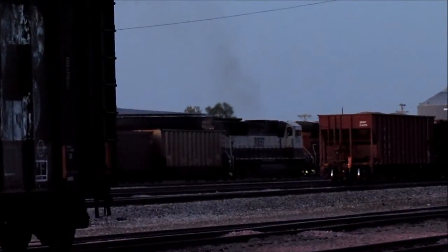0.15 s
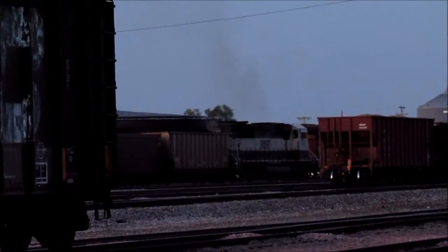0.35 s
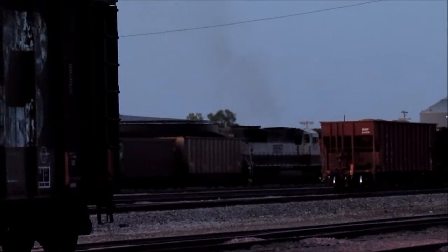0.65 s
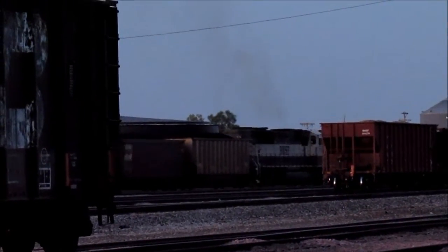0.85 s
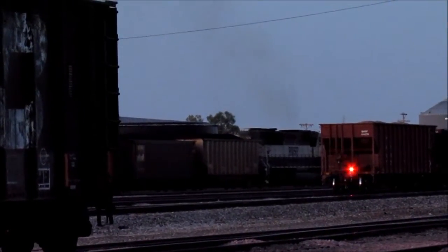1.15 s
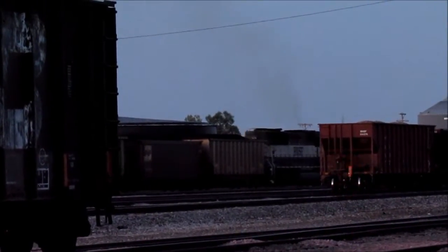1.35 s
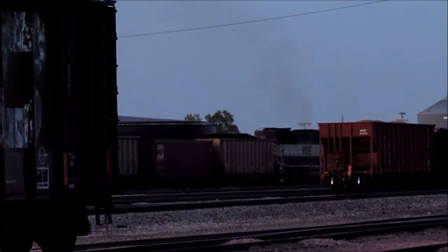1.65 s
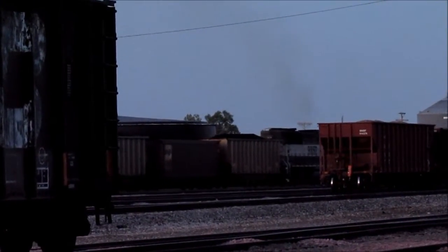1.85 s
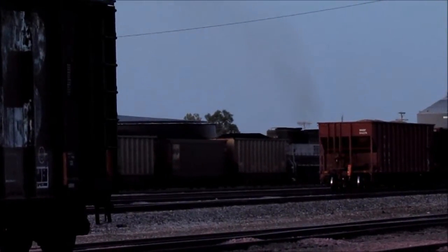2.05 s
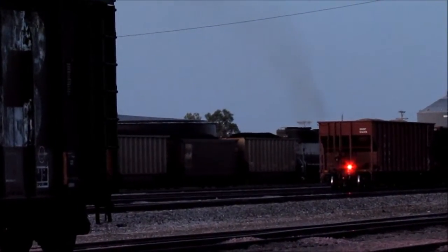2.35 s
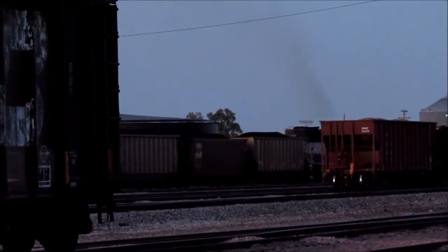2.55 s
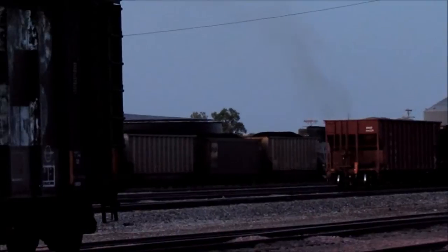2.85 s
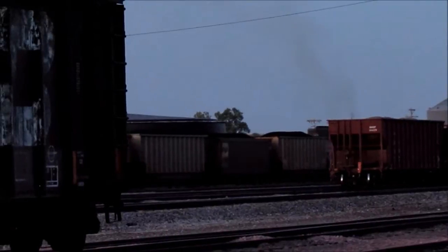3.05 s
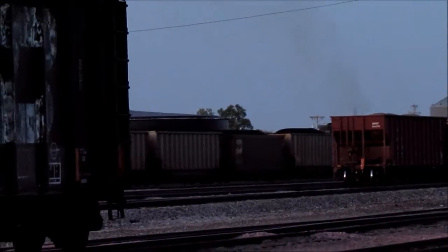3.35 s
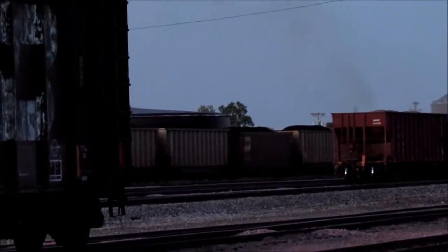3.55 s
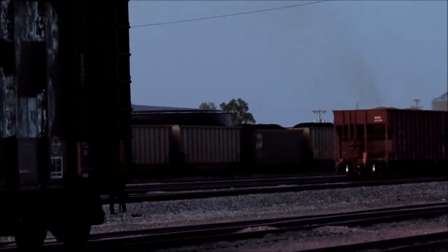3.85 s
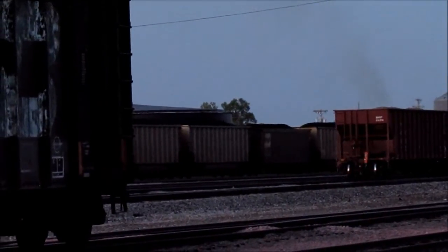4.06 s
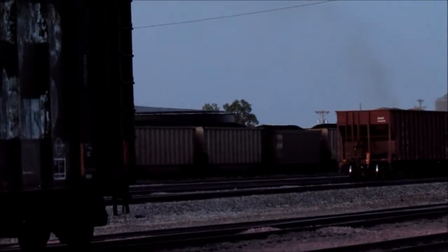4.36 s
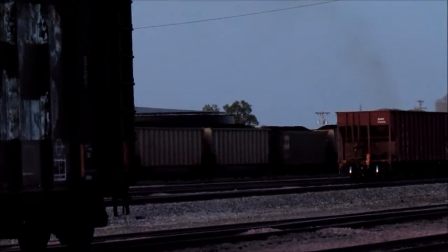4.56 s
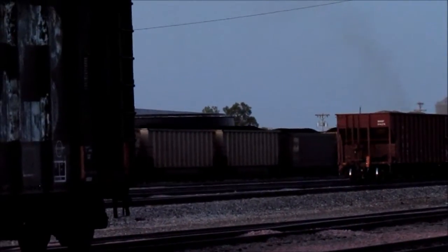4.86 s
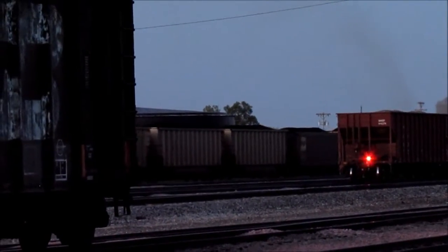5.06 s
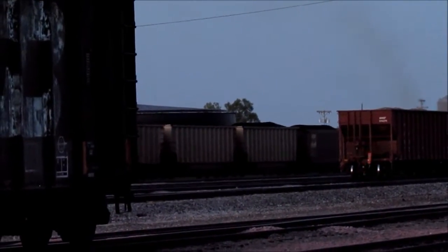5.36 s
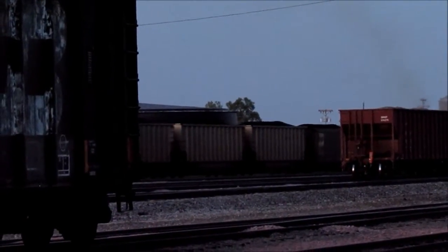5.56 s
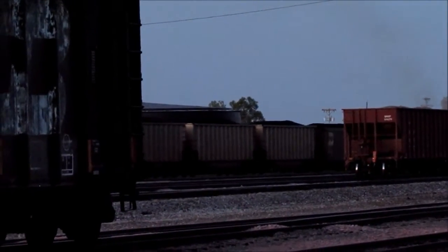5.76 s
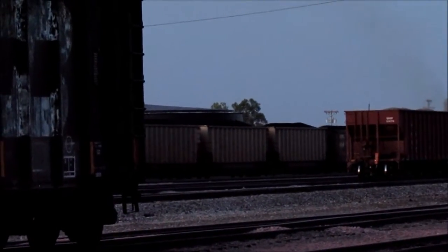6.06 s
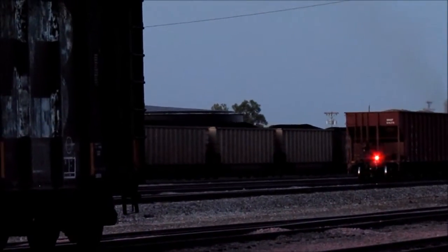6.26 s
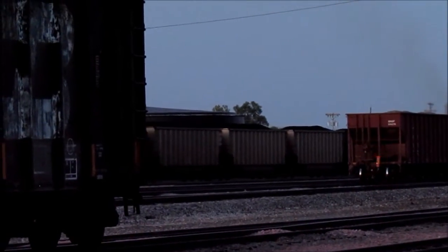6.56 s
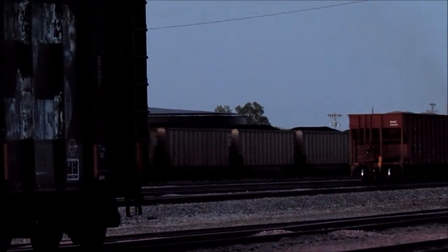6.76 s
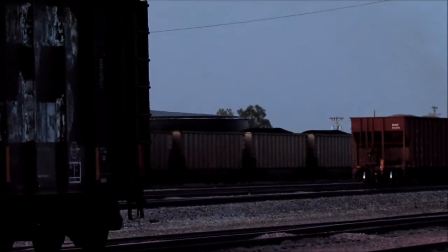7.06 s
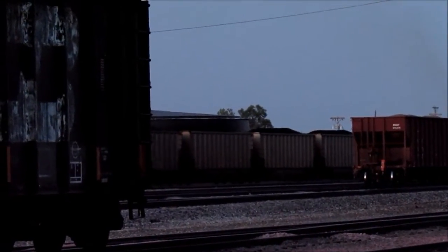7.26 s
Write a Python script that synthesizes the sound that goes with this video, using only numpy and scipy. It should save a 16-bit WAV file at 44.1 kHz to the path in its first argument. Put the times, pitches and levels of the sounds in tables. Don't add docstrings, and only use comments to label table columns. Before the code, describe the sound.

For just over seven seconds, a freight train moves slowly through an open yard, heard from beside the track. From the start a locomotive blower holds a constant whine, with a low-mid fundamental and a stack of ringing overtones that flutter, dip and flash separately as echoes change. Below it a diesel throbs softly amid deep wheel rumble. Rushing air is strongest over the first two seconds, then eases slightly. From about 0.3 seconds, tiny, very high steel squeaks recur three times a second, gradually a little louder. Around 2.5 seconds and again from 4.4 to 5.1, a rough gear tone rises briefly. After 4 seconds the rolling noise of nearer cars grows, with airy puffs through gaps; soft gritty hisses become clearer after 6. The treble widens and leans right, and everything continues to the end without stopping.

```python
import sys
import numpy as np
from scipy import signal
from scipy.fft import rfft, irfft, next_fast_len
from scipy.io import wavfile
from scipy.ndimage import uniform_filter1d

SR = 44100
rng = np.random.default_rng(int(sys.argv[2]) if len(sys.argv) > 2 else 0)


def master(y):
    cut = np.clip(np.atleast_2d(y).T, -1, 1)
    pcm = np.round(cut * 32767)
    wavfile.write(sys.argv[1], SR, pcm.astype(np.int16))


def to_linear_factor(level_db):
    exponent = np.asarray(level_db, float) / 20
    return 10 ** exponent


N = 327214
BLADE_HZ = 324.4
FIRING_HZ = 12.8

# multiple of BLADE_HZ, level_db
OVERTONES = [(7, -38), (8, -39), (9, -39.5), (10, -41), (11, -45.5), (12, -43.5), (13, -46.5), (14, -47),
             (15, -49.5), (16, -46), (17, -46.5), (18, -48.5), (19, -51.5), (20, -51.5), (21, -60),
             (22, -58)]
# centre_s, partial (number), lift_db, half_width_s
GLINTS = [(0.24, 10, -12.5, 0.04), (0.6, 7, 9, 0.068), (0.5, 8, 7, 0.2), (0.7, 9, 5.5, 0.25),
          (0.76, 8, -11.0, 0.04), (0.8, 7, -13, 0.04), (0.92, 8, 7, 0.06), (0.98, 7, 8, 0.053),
          (1.04, 9, -13, 0.04), (1.04, 10, -11.0, 0.04), (1.64, 8, 8, 0.04), (1.14, 9, 7, 0.036),
          (1.42, 8, 3, 0.35), (1.62, 7, 5, 0.065), (1.36, 10, 4, 0.06), (1.8, 9, 9, 0.048),
          (2.06, 7, -7, 0.24), (2.18, 9, -16.5, 0.04), (2.56, 10, -12.0, 0.034), (2.64, 7, -11.0, 0.12),
          (2.64, 9, -7.5, 0.6), (2.68, 8, -4, 0.18), (3.38, 8, -14, 0.077), (3.42, 9, -15, 0.067),
          (3.46, 10, -2.5, 1.0), (3.48, 7, -8.0, 0.22), (3.96, 8, 7, 0.14), (4.06, 7, 9, 0.06),
          (4.06, 10, 11.5, 0.08), (4.48, 8, -10.0, 0.049), (4.8, 7, -11.5, 0.051), (5.16, 10, 4, 0.14),
          (5.38, 9, -6.0, 0.082), (5.4, 10, -10, 0.053), (5.54, 8, -9.0, 0.04), (5.7, 10, -10.5, 0.09),
          (5.88, 9, 6, 0.04), (5.98, 10, -16, 0.061), (6.04, 7, 5, 0.14), (6.12, 8, 2, 0.22),
          (6.34, 7, -10, 0.06), (6.6, 10, -9, 0.06), (6.62, 7, 9, 0.035), (6.64, 9, -8.0, 0.06),
          (6.68, 10, 8, 0.6), (5.55, 10, 3, 0.05), (7.02, 9, 4.5, 0.95), (7.08, 8, -11, 0.04),
          (7.1, 9, -13.0, 0.045), (7.12, 8, 1.5, 0.35),
          (0.02, 11, -17.0, 0.04), (0.04, 15, 7.5, 0.06), (0.06, 16, 9, 0.067),
               (0.22, 13, -10.5, 0.09), (0.34, 16, -12.0, 0.13), (0.76, 13, -15.0, 0.04),
               (0.88, 11, -8.0, 0.09), (0.9, 11, 6, 0.6), (1.16, 13, 4, 0.2), (1.16, 15, -15, 0.09),
               (1.26, 11, -13, 0.06), (2.14, 12, -5, 0.96), (2.14, 14, -7.5, 0.95), (2.26, 15, -4, 0.96),
               (2.34, 13, -7.5, 1.0), (2.68, 11, -7, 0.35), (2.78, 14, 5, 0.1), (3.18, 16, -14.5, 0.06),
               (3.62, 12, -15.0, 0.04), (3.62, 16, -12, 0.38), (3.86, 11, 10.5, 0.04), (4.0, 13, 6, 0.14),
               (4.08, 11, -4.5, 1.0), (4.38, 16, 10, 0.12), (4.9, 14, 7, 0.09), (4.92, 15, -4, 0.14),
               (5.06, 11, -5, 0.14), (5.24, 15, -15.0, 0.04), (5.36, 11, 5, 0.09), (5.54, 15, 6, 0.06),
               (5.58, 13, 10, 0.04), (5.6, 16, 2.5, 0.94), (5.74, 15, 11.5, 0.95), (5.88, 13, -3, 0.2),
               (5.9, 16, -10.0, 0.06), (5.92, 11, -13.0, 0.04), (5.96, 12, -15.5, 0.065),
               (6.1, 12, 5, 0.04), (6.85, 13, 4, 0.08), (6.22, 11, 8, 0.09), (6.22, 15, -11, 0.14),
               (6.26, 14, 5.5, 1.0), (6.34, 13, 11.5, 1.0), (6.54, 12, 8, 1.0), (6.58, 11, 3, 0.81),
               (6.76, 11, -10.5, 0.09), (6.76, 12, -11, 0.04), (6.9, 15, 9.0, 0.06)]


def blower(duct_db):
    turns = np.cumsum(BLADE_HZ + 0.0463 * drift(0.4)) / SR + 0.0065 * drift(44)
    out = 0
    for k, level_db in enumerate(fades(), 1):
        out += partial(k * turns, k * BLADE_HZ, level_db, scatter=0.0007 * k ** 3, rate=3.5 * k, wander=0.09 * k)
    for k, level_db in OVERTONES:
        glint_db = bumps(for_item(GLINTS, k))
        out += partial(k * turns, k * BLADE_HZ, level_db + glint_db,
                       scatter=0.3, rate=2.4 * k, wander=0.44 * np.sqrt(k))
    duct_hz = 1922
    out += partial(duct_hz * np.arange(N) / SR, duct_hz, duct_db - 0.5, scatter=0.95, rate=80.0)
    shake = 1 + 0.035 * np.sin(4 * np.pi * FIRING_HZ * np.arange(N) / SR)
    return shake * out


# time_s, shed_wall_m, car_side_m
DETOURS = [(0.0, 8.65, 24.212), (0.53, 9.352, 24.935), (1.06, 9.981, 25.498), (1.59, 10.502, 26.167),
           (2.12, 11.087, 26.714), (2.65, 11.732, 26.815), (3.18, 12.377, 26.961), (3.71, 13.104, 27.44),
           (4.24, 13.351, 27.718), (4.77, 14.101, 28.039), (5.3, 14.704, 28.212), (5.83, 15.133, 28.629),
           (6.36, 15.58, 28.969), (6.89, 16.134, 29.365), (7.42, 16.159, 29.496)]
# time_s, direct_db, wall_echo_db, car_echo_db
PATHS_OPEN = [
    (0.0, 6.5, 5.5, 7),
    (1.24, 4.5, 15, -8),
    (2.47, -2, 4.5, 6.5),
    (3.71, -4, 2, 6),
    (4.95, -1.27, -9.5, -0.2),
    (6.18, -2.5, -12.5, -6.5),
    (7.42, -3, -3, -4),
]
# direct_db, wall_echo_db, car_echo_db, direct_share (of its opening), growth_db_per_s
PARTIALS = [
    (-36.5, -39.5, -37, 2.74, 5),
    (-31, -29.5, -32.5, 3.85, 5.5),
    (-25, -49.5, -46, 0.59, 0.5),
    (-25, -49, -34.5, 0.83, 0.6),
    (-25, -64, -47.5, 0.7, -0.26),
    (-27, -49.5, -45.5, 1.04, 0.86),
]
REFLECT_DEPTH = [(0.02, 0.921), (0.478, 0.076), (0.32, 0.3), (0.15, 0.004), (0.148, 0.189), (0.16, 0.074)]
# centre_s, partial (number), depth_db, half_width_s
DROPOUTS = [(0.05, 4, -13, 0.062), (0.47, 2, -5, 0.09), (0.79, 4, -10, 0.032), (0.95, 4, -17, 0.029),
            (1.76, 3, -11, 0.055), (1.95, 2, -6, 0.27), (1.99, 3, -4.4, 0.093), (2.34, 3, -10, 0.046),
            (2.64, 3, -24, 0.098), (3.36, 2, -16, 0.063), (3.42, 4, -6, 0.25), (3.71, 2, -12, 0.059),
            (4.27, 3, -12, 0.053), (4.4, 4, -17, 0.013), (4.45, 3, -5.4, 0.042), (4.74, 4, -14, 0.078),
            (4.95, 5, -2.5, 0.1), (5.93, 2, -4, 0.026), (2.29, 2, -5, 0.023), (0.54, 2, -6, 0.034),
            (5.68, 2, -1.5, 0.077), (5.17, 1, -12, 0.058), (2.18, 1, -2, 0.06), (4.45, 6, -6, 0.033),
            (5.37, 3, -9.5, 0.093), (5.56, 4, -12, 0.32), (6.27, 3, -8, 0.047), (6.31, 4, -9, 0.095),
            (6.68, 2, -11.5, 0.084), (6.86, 3, -5.5, 0.22), (7.37, 3, -16, 0.065),
            (0.05, 5, -3.5, 0.16), (0.28, 6, -5, 0.053), (0.5, 6, -16, 0.046), (0.71, 6, -25, 0.082),
                  (0.99, 5, -12, 0.044), (1.04, 6, -9, 0.068), (1.229, 5, -13, 0.03), (1.88, 5, -9, 0.042),
                  (2.35, 5, -31, 0.029), (2.56, 6, -29.1, 0.057), (3.26, 6, -30.0, 0.027),
                  (3.72, 6, -17.3, 0.018), (3.93, 6, -30.0, 0.018), (4.19, 5, -11, 0.034),
                  (4.47, 5, -12, 0.027), (4.76, 6, -19, 0.062), (5.16, 6, -14, 0.033), (5.4, 6, -9, 0.03),
                  (5.47, 5, -11.5, 0.063), (5.839, 6, -5.5, 0.32), (5.99, 5, -6, 0.068),
                  (6.34, 6, -10, 0.14), (6.73, 5, -10, 0.051), (7.02, 6, -15, 0.044)]
# centre_s, partial (number), lift_db, half_width_s
SWELLS = [(0, 1, 5.5, 0.18), (0.17, 5, 8, 0.047), (1.1, 4, 6, 0.044), (1.34, 2, 4, 0.07),
          (1.52, 5, 4.5, 0.19), (1.65, 6, 3.5, 0.16), (2.09, 2, 7.5, 0.15), (2.14, 6, 8, 0.014),
          (2.26, 5, 4.5, 0.14), (2.51, 6, 9, 0.067), (2.61, 3, 4.5, 0.42), (2.89, 6, 7.5, 0.11),
          (2.9, 4, 4.5, 0.093), (3.32, 4, 16, 0.039), (3.38, 1, 5, 0.28), (3.41, 6, 6.5, 0.076),
          (3.92, 2, 6, 0.18), (3.94, 5, 7.5, 0.2), (4.06, 4, 13, 0.054), (4.1, 6, 8, 0.091),
          (4.31, 5, 7, 0.038), (4.66, 3, 5, 0.068), (5.08, 6, 5.5, 0.062), (5.19, 3, 5.5, 0.24),
          (5.23, 4, 9, 0.56), (5.8, 3, 5, 0.089), (6.02, 6, 8.5, 0.067), (6.22, 6, 11, 0.083),
          (7.06, 4, 7, 0.019), (7.34, 5, 8, 0.16)]
# centre_s, partial (number), lift_db
BLINKS = [(0.3, 5, -5), (0.55, 3, -1), (0.83, 3, 0), (1.42, 4, -11), (2.02, 5, -10), (2.59, 4, -12),
          (2.78, 4, -12), (2.72, 6, -8), (3.13, 5, -16), (3.62, 3, -9), (4.35, 6, -5), (4.51, 4, -8),
          (4.82, 5, -11), (5.53, 4, -13), (5.67, 4, -20), (5.72, 5, 2), (6.5, 6, 6), (6.7, 4, -9),
          (6.93, 3, -10), (7.27, 6, 0), (7.28, 4, -15)]


def fades():
    speed_m_per_s, midway_s, blink_s = 343, 3.7, 0.013
    detours = in_time(DETOURS)
    direct_open, *echo_open = in_time(PATHS_OPEN)
    rows = DROPOUTS + SWELLS + [(*blink, blink_s) for blink in BLINKS]
    levels = []
    for k, (row, depths) in enumerate(zip(PARTIALS, REFLECT_DEPTH), 1):
        direct_db, *echo_db, share, growth = row
        wave_m = speed_m_per_s / (k * BLADE_HZ)
        paths = to_linear_factor(direct_db + share * direct_open)
        for db, open_db, detour, depth in zip(echo_db, echo_open, detours, depths):
            paths = paths + to_linear_factor(db + open_db) * np.exp(2j * np.pi * (detour + depth) / wave_m)
        approach_db = growth * (np.arange(N) / SR - midway_s)
        levels.append(20 * np.log10(np.abs(paths) + 1e-6) + approach_db + bumps(for_item(rows, k)))
    return levels


# multiple of FIRING_HZ, level_db (under the rumble)
EXHAUST = [(4, -13), (6, -6), (7, -15), (8, -9), (9, -13), (10, -4), (11, -15), (12, -10), (14, -7),
           (15, -15), (17, -21), (19, -19), (21, -21), (23, -21)]
# pitch_hz, level_db (per Hz)
RUMBLE = [(25, -19.5), (40, -10), (60, -1.5), (130, 0.5), (190, -2.5), (230, -8.5), (320, -19.5),
          (450, -57)]
# time_s, level_db
LOAD = [(0.0, -40), (0.12, -38), (0.64, -41.5), (1.24, -38), (1.26, -40.5), (1.49, -40), (1.71, -44.5),
        (3.35, -35), (4.67, -35.5), (5.39, -38.5), (7.25, -34), (7.42, -38)]
# centre_s, peak_db
GEAR_BURSTS = [(0.07, -53), (0.27, -43.5), (0.42, -56), (0.86, -41), (1.02, -51), (1.46, -41), (2.11, -55),
               (2.45, -31), (2.8, -37), (2.95, -37), (3.77, -42), (4.42, -33), (4.56, -32.5), (4.7, -39),
               (4.83, -30), (5.05, -28), (5.2, -40), (5.52, -40), (5.99, -34.5), (6.75, -52)]


def diesel():
    load_db, = in_time(LOAD)
    turns = np.cumsum(FIRING_HZ * (1 + 0.00453 * drift(0.61))) / SR
    out = 0
    for k, db in EXHAUST:
        out += partial(k * turns, k * FIRING_HZ, load_db + db - 3, scatter=0.25, rate=0.8)
    gear_hz, rest_db, burst_s = 895, -44, 0.04
    gear = to_linear_factor(rest_db) + bumps((s, to_linear_factor(db), burst_s) for s, db in GEAR_BURSTS)
    out += partial(gear_hz * np.arange(N) / SR, gear_hz, 20 * np.log10(gear), scatter=0.71, rate=19.0)
    rumble = bands(19.4, count=14, level_db=lambda hz: at_hz(RUMBLE, hz), patchy_db=-2.5)
    return out + to_linear_factor(load_db - 24.0) * rumble


# centre_s, peak_db
GRIT = [
    (3.85, -59),
    (4.6, -59),
    (5.36, -55),
    (5.72, -55),
    (5.98, -57),
    (6.28, -52),
    (6.6, -48),
    (6.93, -46),
    (7.25, -48),
]


def wheel():
    squeak_hz, first_s, turn_s, squeak_s = 9230, 0.262, 0.3224, 0.032
    squeak_rows = []
    for k, chance in enumerate(rng.standard_normal(22)):
        peak_db = -50 + 0.2 * k + 0.7 * chance
        squeak_rows.append((first_s + k * turn_s, to_linear_factor(peak_db), squeak_s))
    chirp = partial(squeak_hz * np.arange(N) / SR, squeak_hz, np.full(N, -4.0), scatter=0.8, rate=320.0)
    squeaks = bumps(squeak_rows) * chirp
    puffs = bumps((s, to_linear_factor(db), 0.05) for s, db in GRIT)
    high = signal.butter(4, 12000, "high", fs=SR, output="sos")
    hiss = signal.sosfilt(high, rng.standard_normal((2, N)))
    return squeaks + puffs * to_linear_factor(13.0) * stereo(hiss[0], 0.4 * hiss[1], squeak_hz)


# time_s, level_db
AIR = [(0.0, -35), (0.04, -28.5), (0.18, -27.5), (2.46, -33), (2.67, -33.5), (2.91, -31), (3.29, -32.5),
       (5.27, -32), (5.46, -33), (6.16, -34), (6.22, -33), (6.86, -29), (7.0, -33.5), (7.05, -32),
       (7.36, -34), (7.42, -35)]
# time_s, level_db
ROLL = [(0.0, -36.5), (0.18, -38), (1.18, -36.5), (1.65, -40.5), (2.56, -38), (2.62, -37), (3.76, -37),
        (3.89, -33), (4.53, -30.5), (4.73, -28), (5.27, -31.5), (6.18, -31), (6.34, -32), (6.94, -29),
        (7.09, -30.5), (7.42, -28)]
# centre_s, lift_db, half_width_s
PUFFS = [(0.1, 5, 0.079), (0.62, 7.5, 0.74), (2.3, 6.5, 0.21), (2.8, 3.5, .12), (3.9, 4.5, 0.056),
         (4.32, 5.5, 0.27), (4.75, 3, 0.094), (5.0, 4, 0.12), (5.5, -5, 0.15), (5.74, 4.5, 0.05),
         (5.86, 0.5, .04), (6.02, 5.5, 0.079), (6.3, 1.5, .06), (6.45, 1, .06), (6.72, -1, .06),
         (6.94, 1.5, 0.09), (7.12, -7, .05), (7.25, -3, 0.045), (7.37, -10, 0.068)]
# mean_db, air_share, roll_share, puff_share (shares of each swing)
RUSH_MIX = [(-42, 0.1, 0.73, 0.039), (-34.5, 0.73, 0.019, 0.16), (-34, 0.43, 0.46, 0.16),
            (-33.5, 0.01, 0.99, 0.035), (-41.5, 0.14, 0.48, 0.44), (-49, 0.25, 0.2, .7),
            (-55, 0.27, 0.05, 0.89)]
# centre_s, anchor (from 0), lift_db, half_width_s
SHADES = [(1.06, 2, 2.5, 0.99), (1.6, 1.5, 2, .15), (2.9, 2, -2, .3), (1.9, 4.5, 0, .4),
          (1.85, 4.5, -2, .2), (2.12, 5.5, -5, 0.23), (2.6, 1, -0.5, .15), (4.35, 4.5, 2, 0.1),
          (4.76, 3, 0.5, 0.054), (4.45, 2, -5.5, 0.1), (5.35, 2, -2.5, .15), (7.7, 5.5, -1, 0.1),
          (5.8, 3, 3, 0.18), (2.05, 0.5, -2.5, 0.63), (6.0, 4.5, 2.5, .1), (6.8, 1.5, 2, 0.085),
          (5.5, 6, -3, .2), (6.55, 6, -2, .25), (7.3, 6, -2, .15), (7.0, 0, 0.5, .4), (6.1, 2, 3.5, .12)]


def rush_levels():
    air = in_time(AIR)[0] + 33
    roll = in_time(ROLL)[0] + 36
    puffs = bumps(PUFFS)
    levels = []
    for k, (mean_db, air_share, roll_share, puff_share) in enumerate(RUSH_MIX):
        swing = air_share * air + roll_share * roll + puff_share * puffs
        levels.append(mean_db + swing + bumps(for_item(SHADES, k)))
    return levels


RUSH_AT_HZ = [480, 1500, 2800, 4500, 5900, 7800, 10000]
# pitch_hz, level_db (per Hz)
RUSH_SHAPE = [(250, -26), (330, -28), (450, -31.5), (800, -25), (1100, -22.5), (1700, -29.5), (2300, -32),
              (3000, -33), (4400, -35), (6300, -28.5), (7000, -30.5), (9000, -38.5), (11000, -34.5),
              (13000, -31)]
# time_s, share_removed (0-1)
HOLLOW = [
    (0, 0.1),
    (0.6, 0.26),
    (2.3, 0.27),
    (2.8, .15),
    (3.9, 0.08),
    (7.42, 0),
]


def rush(levels):
    def level_db(hz):
        weights = [np.interp(np.log(hz), np.log(RUSH_AT_HZ), row) for row in np.eye(len(levels))]
        return at_hz(RUSH_SHAPE, hz) + sum(w * db for w, db in zip(weights, levels) if w > 0)

    air = bands(257.4, count=17, level_db=level_db, patchy_db=1.36)
    hollow_hz, width_hz = 4440, 530
    hollow = signal.lfilter(*signal.iirpeak(hollow_hz, hollow_hz / width_hz, fs=SR), air)
    return air - np.clip(in_time(HOLLOW)[0], 0, 1) * hollow


def partial(turns, hz, level_db, scatter, rate, wander=0.47):
    direct = np.exp(2j * np.pi * rng.random())
    share = np.clip(scatter, 0, 1)
    echoes = drift(rate) + 1j * drift(rate)
    mid = np.sqrt(1 - share) * direct + np.sqrt(share / 2) * echoes
    side = (drift(0.5 * rate) + 1j * drift(0.41 * rate)) / np.sqrt(2)
    mid = mid * np.exp(1j * wander * side.imag)
    level = to_linear_factor(level_db)
    lasting = np.sqrt(level * uniform_filter1d(level, size=SR // 2))
    placed = stereo(level * mid, 0.42 * lasting * side, hz)
    return np.sqrt(2) * (placed * np.exp(2j * np.pi * turns)).real


def bands(low_hz, count, level_db, patchy_db):
    out = 0
    together = drift(1.5)
    edges = low_hz * 2 ** (np.arange(count + 1) / 3)
    white = rng.standard_normal((2, 2, N))
    for k, (low, high) in enumerate(zip(edges, edges[1:])):
        band = signal.butter(2, [low, high], "band", fs=SR, output="sos")
        mid, side = signal.sosfilt(band, white[k % 2])
        hz = np.sqrt(low * high)
        flicker_db = patchy_db * (0.22 * together + drift(18.0))
        gain = to_linear_factor(level_db(hz) + flicker_db) * np.sqrt(SR / 2)
        width = np.clip(0.24 + hz / 5000, 0, 0.8)
        out = out + gain * stereo(mid, side * width, hz)
    return out


# pitch_hz, likeness (0-1)
LIKENESS = [(60, 0.97), (130, 1), (270, 0.94), (570, 0.92), (1210, 0.86), (2560, 0.63), (5430, 0.94),
            (11500, 0.49)]
# pitch_hz, left_minus_right_db
LEAN = [(200, 0.45), (620, -0.4), (1110, -0.5), (2000, -2), (3000, -5), (4200, 0), (6400, 1.5), (11500, -1)]
# time_s, extra_left_minus_right_db, spread_db
SWING = [
    (0, 0.5, -0.5),
    (2.0, 0.5, 0),
    (3.5, 0, 4.5),
    (4.2, -1.5, 4.5),
    (5.2, -1.7, 6),
    (6.2, -3, 7.5),
    (7.42, -3, 8.5),
]


def stereo(mid, side, hz):
    swing_db, spread_db = in_time(SWING)
    alike = np.clip(at_hz(LIKENESS, hz), 0, 1)
    apart = np.sqrt((1 - alike) / (1 + alike)) * to_linear_factor(spread_db)
    lean_db = at_hz(LEAN, hz) + swing_db * np.clip(hz / 2500, 0, 1)
    sign = np.array([[1], [-1]])
    return to_linear_factor(sign * lean_db / 2) * (mid + apart * side * sign)


def drift(rate):
    r = np.exp(-80 * np.pi * rate / SR)
    slow = signal.lfilter([1], [1, -2 * r, r * r], rng.standard_normal(N // 40 + 2002))[2000:]
    return np.interp(np.arange(N) / 40, np.arange(len(slow)), rms_one(slow))


def bumps(rows):
    t = np.arange(0, N + 44, 44) / SR
    coarse = np.zeros(len(t))
    for s, height, width in rows:
        coarse = coarse + height * np.exp(-((t - s) / max(width, 0.01)) ** 2)
    return np.interp(np.arange(N) / SR, t, coarse)


def for_item(rows, k):
    return [(s, db, width) for s, which, db, width in rows if round(which) == round(k)]


def in_time(rows):
    s, *columns = np.transpose(rows)
    return [np.interp(np.arange(N) / SR, s, c) for c in columns]


def at_hz(points, hz):
    point_hz, value = np.transpose(points)
    return np.interp(np.log(hz), np.log(point_hz), value)


def rms_one(x):
    return x / np.sqrt(np.mean(np.abs(x) ** 2) + 1e-20)


def scene():
    levels = rush_levels()
    return blower(levels[1]) + diesel() + wheel() + rush(levels)


def roll_off(x):
    return signal.sosfilt(signal.butter(12, 13600, fs=SR, output="sos"), x)


# pitch_hz, left_trails_rad
PORT_LAG = [(200, .02), (900, 0.25), (2300, 0.11), (4300, 0.45), (8000, 0.76)]


def record(dry):
    size = next_fast_len(N)
    lag = at_hz(PORT_LAG, np.arange(size // 2 + 1) * SR / size + 1)
    heard = irfft(rfft(dry, size) * np.exp(0.5j * lag * [[-1], [1]]), size)[:, :N]
    heard = signal.sosfilt(signal.butter(2, 34, "high", fs=SR, output="sos"), heard)
    heard = signal.sosfilt(signal.butter(6, 9600, fs=SR, output="sos"), heard)
    return roll_off(heard)


dry = scene()
out = record(dry)
master(out)
```